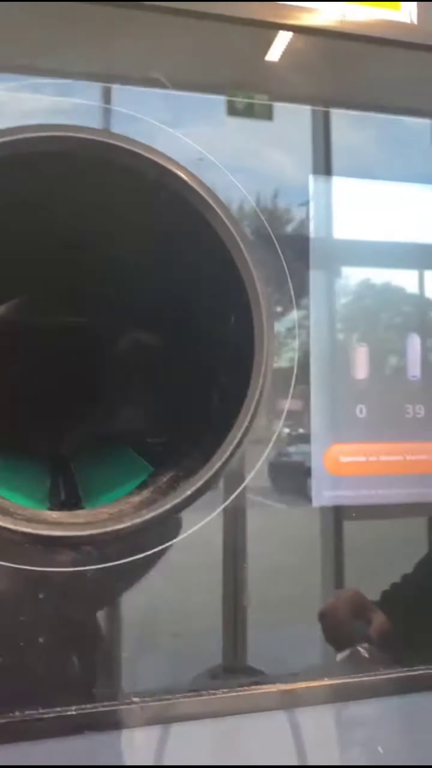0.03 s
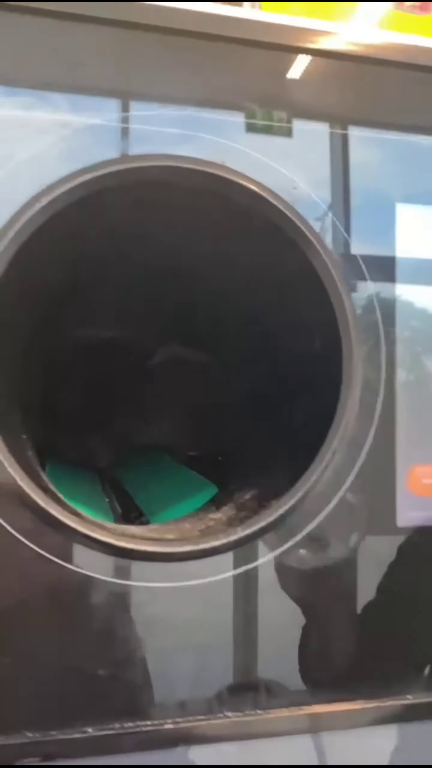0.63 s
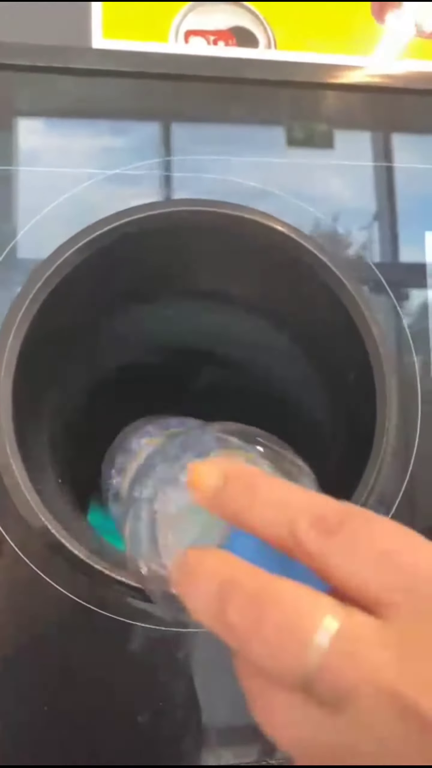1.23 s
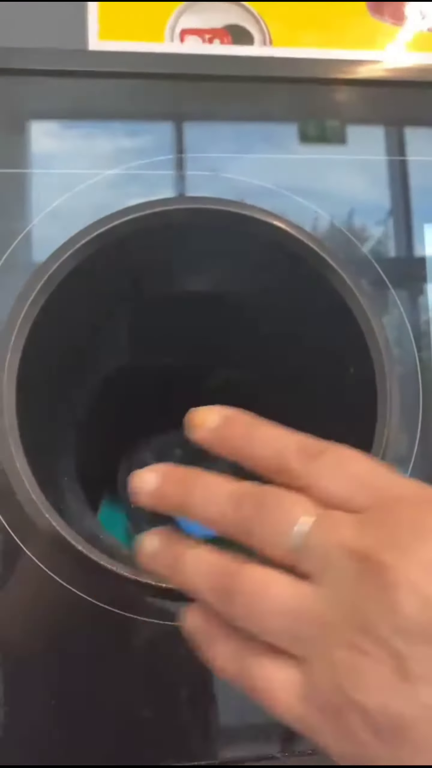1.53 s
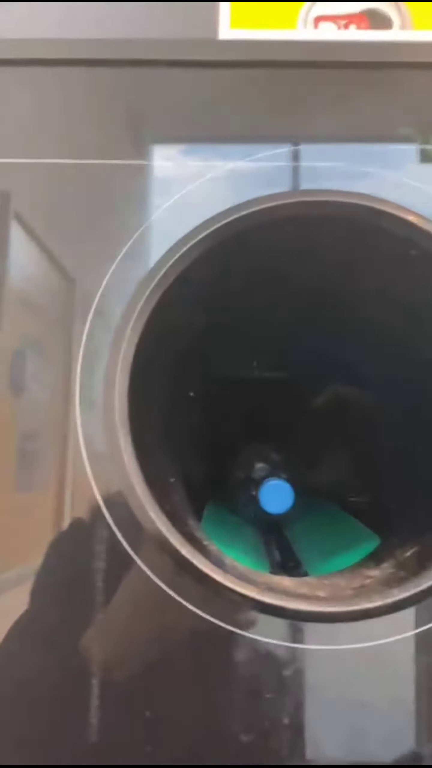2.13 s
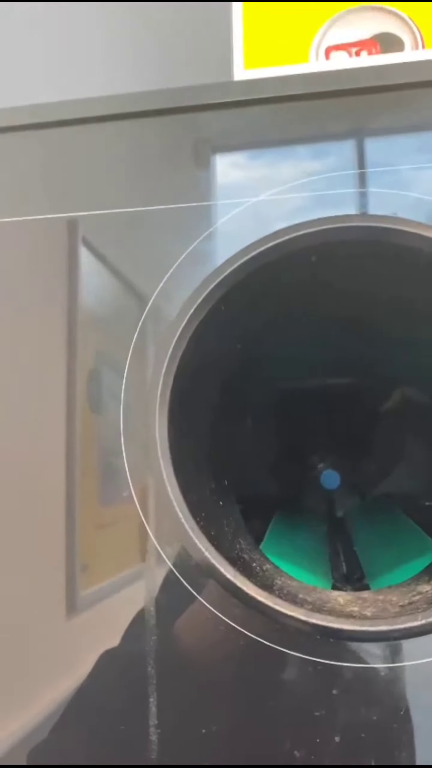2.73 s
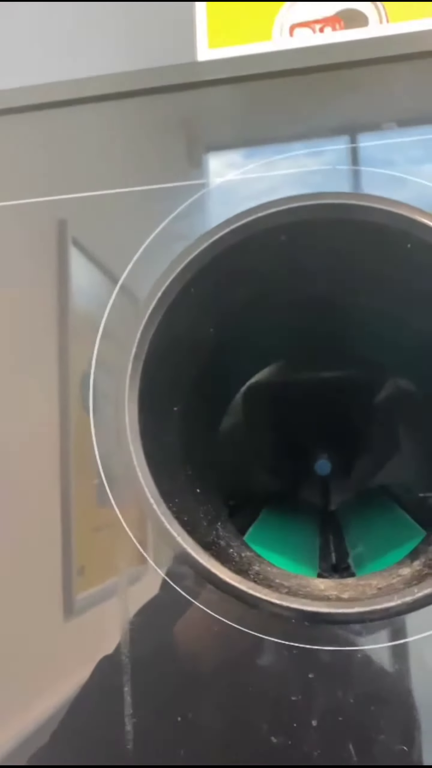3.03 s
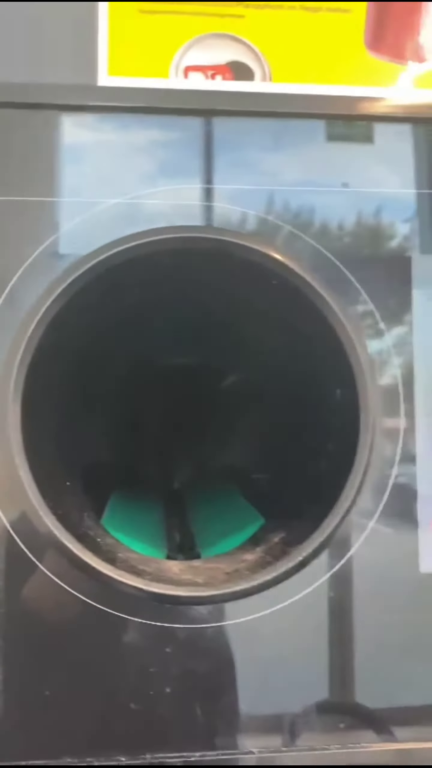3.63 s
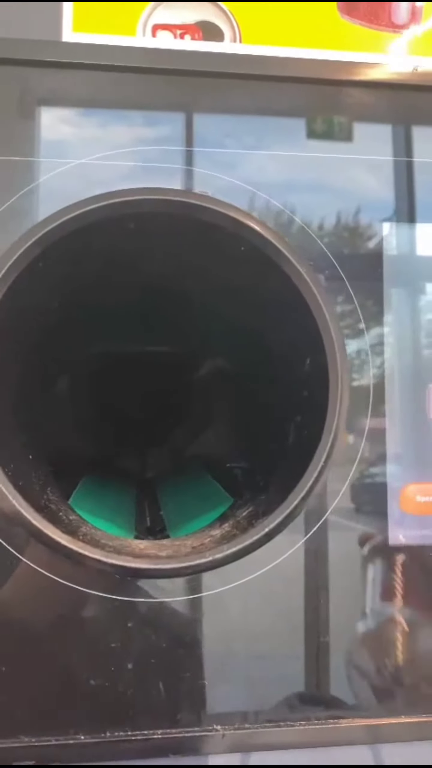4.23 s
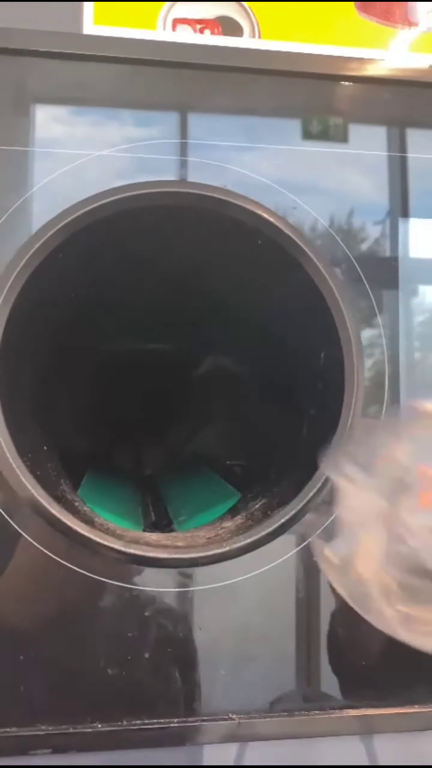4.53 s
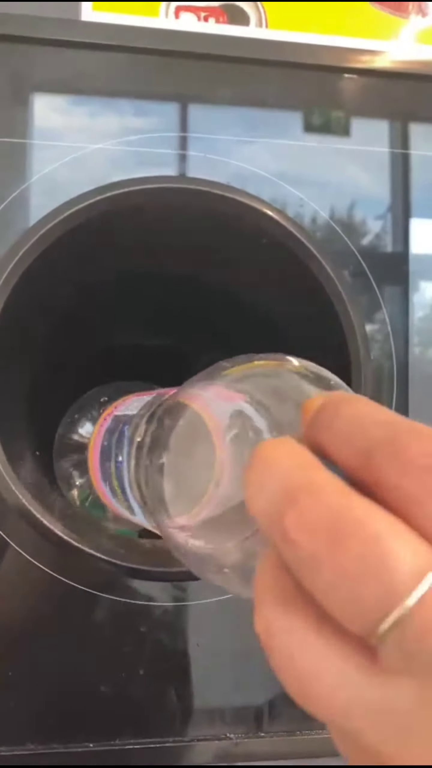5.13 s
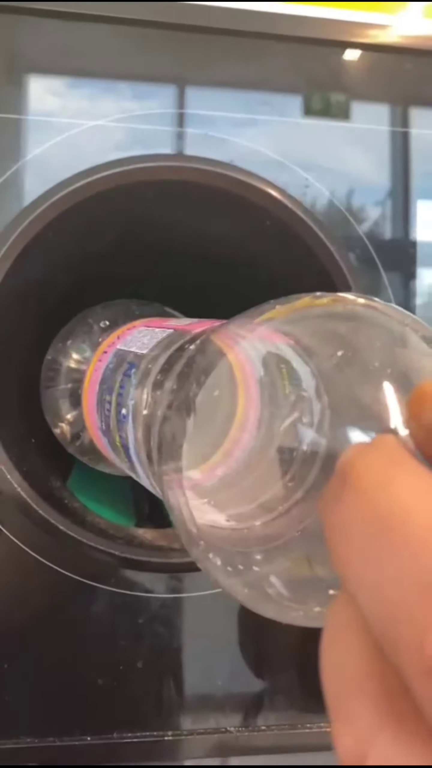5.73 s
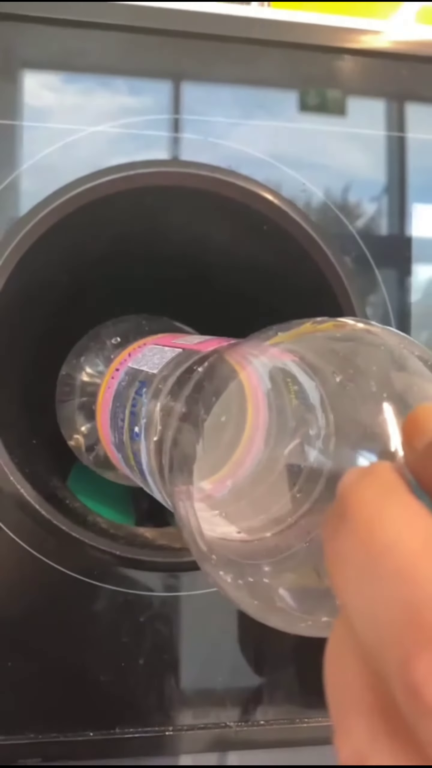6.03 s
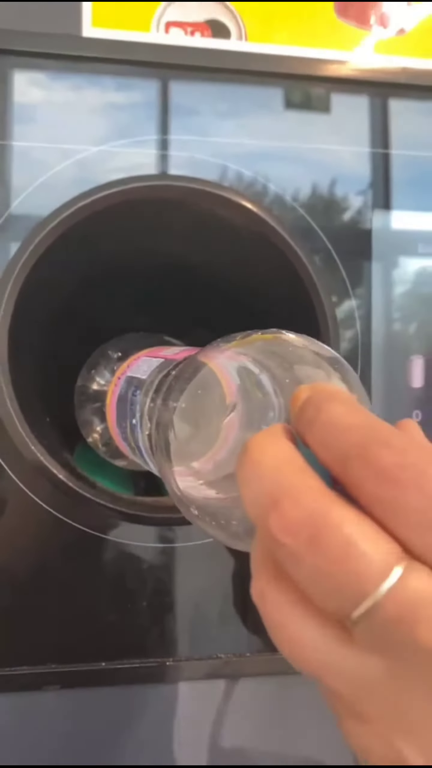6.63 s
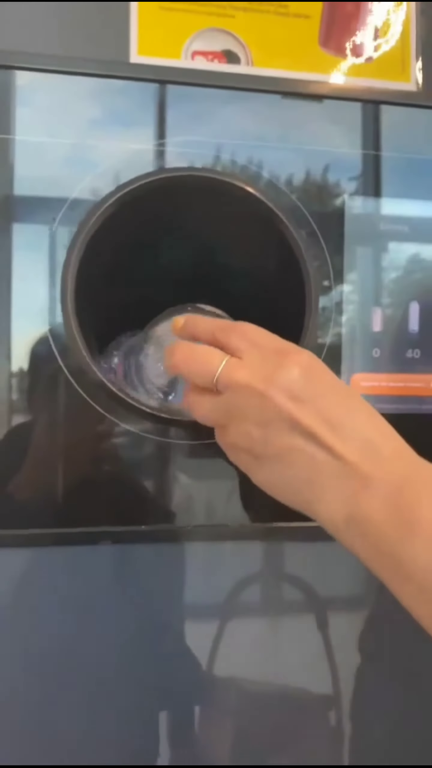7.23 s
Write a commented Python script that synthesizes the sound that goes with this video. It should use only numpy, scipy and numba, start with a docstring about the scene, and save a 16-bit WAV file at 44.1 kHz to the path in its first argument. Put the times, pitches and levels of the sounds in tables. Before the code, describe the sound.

Empty plastic bottles crinkle, snap and bump as they are fed into a humming bottle return machine with a running conveyor belt.

```python
"""In a shop entrance, two empty plastic bottles are fed into a return machine, close to a phone.
A fan rushes, motors hum with a slow beat, and a belt rubs along over rumbling rollers.
The belt carries the first bottle off and drops it inside the cabinet.
Each bottle bumps and scrapes the chute and ticks against the rim. Loudest of all,
the thin walls snap and crinkle in the hand and ring in the round intake."""
import sys
import numpy as np
from scipy import signal
from scipy.fft import rfft, irfft
from scipy.io import wavfile
from scipy.ndimage import uniform_filter1d
from numba import njit

SR = 44100
rng = np.random.default_rng(int(sys.argv[2]) if len(sys.argv) > 2 else 0)


def file_out(sig):
    """Save sig as 16-bit WAV at sys.argv[1]."""
    # one column per channel
    cols = np.atleast_2d(sig).T
    # limit, then scale
    lim = np.clip(cols, -1, 1)
    pcm = np.round(lim * 32767).astype(np.int16)
    wavfile.write(sys.argv[1], SR, pcm)


N = 325017
T = np.arange(N) / SR
FFT_SIZE = 2 ** 19
HZ = np.arange(FFT_SIZE // 2 + 1) * SR / FFT_SIZE + 1e-3
SECOND_BOTTLE_S = 4.5

# Levels in the tables are relative: the functions set the final loudness.
# tone colour of the fan, the rollers and the belt: f/Hz, level/dB
FAN_SPECTRUM = [(18, -34), (30, -9.5), (86, 4.5), (108, -9.5), (272, -10.5), (350, -30), (387, -1),
                (439, -21), (689, -31), (863, -21), (1970, -21.5), (2450, -21), (2700, -29.5), (3980, -33),
                (6570, -38.5), (9500, -41), (12000, -88), (15600, -117), (22000, -120)]
ROLLER_SPECTRUM = [(30, -28), (70, -7.5), (125, 0.5), (175, -6), (270, -4), (350, -7), (480, -6),
                   (620, -15.5), (1000, -18), (3000, -46.5)]
BELT_SPECTRUM = [(300, -21), (650, -3), (870, 9.5), (1100, -4), (1700, -1.5), (2450, -2), (2680, -13),
                 (5000, -16.5), (11000, -30)]
# the rollers rumble more under a bottle: start/s, end/s, boost/dB
ROLLER_LOADS = [(0.282, 0.59, 5), (0.924, 2.414, 2.5), (4.898, 5.85, 2.5)]
# the belt rubs against its guides: middle/s, length/s, boost/dB
GUIDE_RUBS = [(2.56, 0.21, 3), (2.781, 0.17, 8), (2.955, 0.12, 3), (3.117, 0.39, 3.5), (3.365, 0.22, 5),
              (3.674, 0.29, 6.5), (4.08, 0.075, 4), (4.282, 0.11, 3), (4.76, .2, 3)]
# the belt motor takes up load: middle/s, length/s, level/dB
MOTOR_SURGES = [(0.45, 0.7, -40), (1.276, 0.39, -37.5), (1.607, 0.15, -30), (2.04, 0.24, -37.5),
                (2.26, 0.18, -35), (2.467, 0.29, -33.5), (3.515, 1.23, -34.5), (4.75, 0.28, -39),
                (5.183, 0.2, -35.5), (5.997, 0.34, -42), (6.713, 0.19, -39.5)]
# steady tones of the cabinet: f/Hz, level/dB, beat rate/Hz, beat depth (0-1)
HUM_TONES = [(80.3, -46.5, 1.18, 0.1), (99.3, -48, 0.41, 0.07), (132.6, -51, 0.87, 0.66),
             (194.5, -49, 0.713, 0), (260.7, -55.5, 0.89, 0.25), (300.5, -55, 0.52, 0.26),
             (470, -66, 0.57, 0), (663, -60, 0.643, 0.13), (764, -57, 0.95, 0.1), (873, -53, 1.215, 0.22),
             (988, -58.5, 0.63, 0.3)]
# one faint cabinet tone sings out: middle/s, length/s, level/dB
WHINE_SWELLS = [(0.1, 1, -57), (4.7, 0.47, -45.5), (7.04, 1.2, -43.5)]
# a bottle drops inside the cabinet: t/s, level/dB
CABINET_DROPS = [(4.238, -23)]
# a bottle bumps the chute: t/s, level/dB
CHUTE_BUMPS = [(0.462, -28.5), (0.512, -26.5), (0.58, -27), (0.99, -24), (1.105, -29.5), (1.33, -25),
               (1.465, -26), (1.95, -24.5), (2.105, -26), (4.948, -21.5), (5.27, -28), (5.524, -24),
               (5.585, -22), (5.67, -25)]
# what rings when the cabinet or a hollow bottle is struck: f/Hz, level/dB, time to fade by 60 dB/s
CABINET_MODES = [(314, -5, 0.1), (414, 0.5, 0.12), (488, -3, 0.1), (865, -4, .12), (1025, -3, 0.08),
                 (1310, -9, 0.079), (2060, -18, .05)]
FIRST_BUMP_MODES = [(149.3, -0.5, 0.2), (263, -2, 0.16), (303, -5, 0.14), (478, -4, 0.12),
                    (770, -13, 0.064)]
SECOND_BUMP_MODES = [(445, -4.5, 0.18), (751, 2, 0.17), (880, -5, .08), (1760, -8, .06)]
# a bottle scrapes along the chute: start/s, length/s, level/dB, centre f/Hz
CHUTE_SLIDES = [(0.926, 0.22, -44, 1950), (0.965, .035, -35.5, 2320), (1.068, 0.036, -35, 2250),
                (1.119, 0.42, -39.5, 2070), (1.39, 0.086, -38, 2450), (1.549, 0.041, -40.5, 2250),
                (1.646, 0.085, -36, 2550), (1.803, .08, -45.5, 2300), (1.899, 0.052, -35.5, 1700),
                (2.094, 0.086, -40.5, 1590), (2.391, 0.057, -42.5, 1720), (2.555, 0.027, -44, 1720),
                (2.726, 0.052, -45, 1900), (5.57, 0.23, -41.5, 1605), (5.852, .04, -39, 2700),
                (5.921, 0.046, -37.5, 2310), (6.023, 0.028, -30.5, 2200), (6.104, .16, -37, 1870),
                (6.347, 0.056, -46, 2000)]
# light, dry ticks of plastic on the rim: t/s, level/dB
RIM_TICKS = [(0.4173, -9.5), (0.45, -10.5), (0.4854, -4.5), (0.5661, -5), (0.585, -3), (0.6822, -24),
             (0.732, -24), (1.179, -11.5), (1.319, -18), (2.332, -15.5), (3.72, -30), (4.908, -5),
             (5.263, -2.5), (6.594, -29), (6.901, -30), (6.9701, -34), (7.011, -34.5)]
# a bottle rubs under the fingers or on the belt: start/s, length/s, level/dB, treble lift/dB
RUB_STROKES = [(0.33, 0.035, -37.5, -6), (0.437, 0.11, -36, -4), (0.542, 0.032, -29.5, -7),
               (0.772, 0.064, -39, -2.5), (0.861, 0.13, -28.5, 1), (0.996, 0.47, -30.5, 2.5),
               (1.364, 0.23, -33, 3), (1.612, 0.16, -32, 2.5), (1.803, 0.21, -31, 11),
               (2.054, 0.17, -33, 8.5), (2.236, 0.085, -33.5, 1), (2.375, 0.062, -33.5, 0),
               (2.462, 0.17, -49, -7), (4.927, 0.023, -31.5, -11), (5.107, 0.16, -41.5, -17),
               (5.268, 0.059, -27.5, -8), (5.347, 0.13, -34.5, -10), (5.486, 0.039, -31, -13),
               (5.562, 0.2, -25, -3.5), (5.826, 0.13, -32, -9), (6.043, 0.13, -28.5, 3),
               (6.111, 0.1, -27.5, -2), (6.224, 0.13, -34.5, -2), (6.33, 0.049, -34.5, -2),
               (6.464, 0.014, -43, -10), (6.994, 0.17, -54.5, -3)]
# a bottle wall buckles: t/s, level/dB, dent f/Hz, treble lift/dB, rise time/s
WALL_SNAPS = [(0.417, -20, 2470, 4, 0.0018), (0.4496, -15, 2940, 3, .003), (0.4853, -9.5, 5820, 1, 0.0007),
              (0.5656, -9.5, 3000, 12, 0.00065), (0.5724, -13, 1810, 2, 0.0013),
              (0.584, -7.5, 3050, 17, 0.00065), (0.6816, -24, 2930, -6, .0007),
              (0.792, -22.5, 2072, -8, 0.011), (0.853, -21, 2230, 7, 0.0017),
              (0.884, -16.5, 2600, -4, 0.0017), (0.943, -16, 2150, 20, 0.0028),
              (1.027, -25, 2420, -4, 0.0059), (1.128, -26, 2280, -5, 0.0074),
              (1.323, -18, 2440, -3, 0.0075), (1.84, -18.5, 2670, 1, 0.004), (1.936, -18, 1530, 5, 0.008),
              (2.059, -23.5, 2546, 18, 0.0044), (2.09, -16.5, 1800, -10, .005),
              (2.2019, -23, 6870, 22, 0.0041), (2.381, -24.5, 2260, 17, .005),
              (2.477, -30, 1506, -17, 0.0055), (2.498, -38, 1730, -12, 0.0087),
              (2.7074, -33, 2200, 15, 0.0022), (2.801, -30, 2250, -1, .004), (4.907, -8, 6830, 7.5, 0.0011),
              (4.936, -13.5, 1914, 4, 0.012), (5.109, -22.5, 2020, 9.5, 0.0016),
              (5.142, -27, 2360, -15, 0.0067), (5.1739, -14.5, 2604, -1.5, 0.0018),
              (5.235, -15.5, 2525, 5, 0.011), (5.2612, -5.5, 2480, 7, 0.0011),
              (5.2931, -9.5, 1770, 1, 0.001), (5.3547, -17.5, 2670, 5, 0.0016),
              (5.404, -14.5, 2510, 3, 0.001), (5.4976, -19, 2520, 2, 0.00049),
              (5.521, -17, 1980, -1, 0.0023), (5.5752, -16, 1510, -8, 0.0012),
              (5.603, -13.5, 2430, -8, 0.01), (5.668, -13.5, 1990, 1, 0.0062),
              (5.745, -16.5, 1400, 5, .008), (6.015, -13.5, 2287, 0, 0.0052),
              (6.064, -14.5, 2790, 13, 0.0071), (6.1, -10, 2700, 0.5, 0.013), (6.17, -10, 2260, 0.5, 0.008),
              (6.592, -26.5, 2340, -5.5, 0.00056)]
# tone colour of thin plastic: f/Hz, level/dB
PLASTIC_SPECTRUM = [(100, -28), (250, -10.5), (500, -2), (1100, -0.5), (2000, 3), (3200, 3.5), (4500, 3),
                    (6800, 0.5), (8200, -3), (10500, 3), (12000, -15)]
# resonances of each bottle in the intake: f/Hz, width/Hz, level/dB
FIRST_WALL_MODES = [(792, 99, 8), (1460, 120, -0.5), (2250, 133, 3), (2920, 130, -11), (6170, 170, -12)]
SECOND_WALL_MODES = [(451, 30, 7.5), (767, 70, 5), (870, 85, 2.5), (1380, 58, -0.5), (1960, 52, -4),
                     (2250, 290, -4.5), (6600, 300, -5)]
# stereo width, as the side signal compared with the middle: f/Hz, level/dB
STEREO_WIDTH = [(100, -47), (170, -43.5), (310, -24), (400, -14), (620, 0.5), (800, -7), (1150, -5),
                (1900, -25.5), (2600, -5), (5000, -4.5), (6000, -19), (11000, -20)]
# the phone's right microphone compared with its left: f/Hz, level/dB, phase lag/rad
MIC_BALANCE = [(320, 0, 0), (380, -2, 0), (540, -3.5, -0.2), (620, 0, 0), (2200, 0.3, 0), (2850, 10, 0.3),
               (3200, 9, 1.4), (3700, 3, 1.7), (4550, 2, 1.9), (5000, 6, 4.2), (5300, 0.5, 6.2),
               (7200, 0.3, 6.9), (8700, 0, 8.3), (11500, 0, 9.3)]


def undb(db):
    """Turn decibels into a gain."""
    return 10 ** (np.asarray(db) / 20)


def unit(x):
    """Scale to an average (rms) level of one."""
    return x / np.sqrt(np.mean(x ** 2))


def curve(points, column=1):
    """Join one column of a table into a curve over log frequency."""
    points = np.array(points)
    return np.interp(np.log(HZ), np.log(points[:, 0]), points[:, column])


def filtered(x, response):
    """Filter by a frequency response."""
    return irfft(rfft(x, FFT_SIZE) * response)[..., :N]


def causal(db):
    """A response with these levels that rings only after a blow, never before."""
    cepstrum = irfft(np.log(undb(db)))
    cepstrum[1:FFT_SIZE // 2] *= 2
    cepstrum[FFT_SIZE // 2 + 1:] = 0
    return np.exp(rfft(cepstrum))


@njit
def resonate(x, hz, width):
    """Let through a band around a moving pitch, with a gain of one at its peak."""
    y, band, low = np.empty(len(x)), 0., 0.
    for i in range(len(x)):
        tuning, damping = np.tan(np.pi * hz[i] / SR), width / hz[i]
        swing = (band + tuning * (x[i] - low)) / (1 + tuning * (tuning + damping))
        band, low = 2 * swing - band, low + 2 * tuning * swing
        y[i] = damping * swing
    return y


def fade(t, t60):
    """Die away by 60 dB every t60 seconds."""
    return undb(-60 * t / t60)


def swell(middle_s, length_s):
    """A smooth rise to one and fall back."""
    return np.cos(np.pi * np.clip((T - middle_s) / length_s, -.5, .5))


def ramp(start_s, length_s):
    """A straight rise from zero to one."""
    return np.clip((T - start_s) / length_s, 0, 1)


def wobble(per_s):
    """A smooth random curve that heads for a new value per_s times a second."""
    hold = int(SR / per_s)
    steps = np.repeat(rng.standard_normal(N // hold + 1), hold)
    return unit(uniform_filter1d(uniform_filter1d(steps, hold), hold)[:N])


def add(track, s, sound):
    """Mix a short sound in at time s."""
    i = int(s * SR)
    track[i:i + len(sound)] += sound[:N - i]


def diffuse():
    """Noise from all around: alike on both sides in the bass."""
    mid, side = rng.standard_normal((2, N))
    side = filtered(side, undb(curve(STEREO_WIDTH)))
    return np.array([mid + side, mid - side])


def wash(spectrum):
    """Noise from all around with a given tone colour."""
    return unit(filtered(diffuse(), undb(curve(spectrum))))


def fan(level_db=-42.5, flutter_db=0.5):
    """Steady air noise of the machine and the shop."""
    return wash(FAN_SPECTRUM) * undb(level_db + flutter_db * wobble(8.3))


def conveyor(roller_db=-41.5, belt_db=-45.5, judder_db=1.1, chatter_db=1.5, load_ramp_s=0.019):
    """Rollers rumble with their load and the belt rubs in chattering swells; both judder together."""
    judder = undb(judder_db * wobble(60))
    load_db = sum(db * (ramp(start, load_ramp_s) - ramp(end, load_ramp_s))
                  for start, end, db in ROLLER_LOADS)
    rub_db = sum(db * swell(s, length) for s, length, db in GUIDE_RUBS) + chatter_db * wobble(35)
    held_up_db = -8 * ramp(start_s=6.27, length_s=1)  # the second bottle holds the belt up
    rollers = wash(ROLLER_SPECTRUM) * undb(roller_db + load_db)
    belt = wash(BELT_SPECTRUM) * undb(belt_db + rub_db + held_up_db)
    return (rollers + belt) * judder


def motor_tone(hz, wander_hz):
    """One pure tone whose pitch wanders with the motor's speed."""
    return np.sqrt(2) * np.sin(2 * np.pi * np.cumsum(hz + wander_hz * wobble(12)) / SR)


def motors(idle_db=-45, unrest_db=2, whine_idle_db=-51.5, beat_peak_s=0.21):
    """The belt motor drones with its load; the cabinet tones beat slowly and one sings out."""
    load = undb(idle_db + unrest_db * wobble(8))
    for s, length, db in MOTOR_SURGES:
        load = np.maximum(load, undb(db) * swell(s, length))
    hum = load * motor_tone(hz=53.1, wander_hz=1.83)
    for hz, db, beat_hz, depth in HUM_TONES:
        beat = 1 + depth * np.cos(2 * np.pi * beat_hz * (T - beat_peak_s))
        hum += undb(db) * motor_tone(hz, wander_hz=1.0) * beat
    singing = sum(undb(db) * swell(s, length) for s, length, db in WHINE_SWELLS)
    whine = np.hypot(undb(whine_idle_db), singing) * motor_tone(hz=385.6, wander_hz=0.79)
    return hum + whine


def knocks(blows, modes, rattle_db, rattle_t60, rise_s, detune):
    """Soft, dull blows ring a body, each a little differently, and rattle it briefly."""
    out, t = np.zeros(N), T[:SR // 2]
    for s, db in blows:
        ring = np.zeros(len(t))
        for hz, mode_db, t60 in modes:
            pitch = hz * (1 + detune * rng.standard_normal())
            ring += undb(mode_db) * np.sin(2 * np.pi * (pitch * t + rng.random())) * fade(t, t60)
        rattle = undb(rattle_db) * rng.standard_normal(len(t)) * fade(t, rattle_t60)
        knock = (ring + rattle) * np.minimum(t / rise_s, 1)
        add(out, s, undb(db) * knock / np.abs(knock).max())
    return out


def drop():
    """The first bottle falls off the belt and the cabinet rings."""
    return knocks(CABINET_DROPS, CABINET_MODES,
                  rattle_db=-18, rattle_t60=0.048, rise_s=0.0085, detune=0.012)


def bumps():
    """Each hollow bottle bumps the chute and rings with its own notes."""
    early = [(s, db) for s, db in CHUTE_BUMPS if s < SECOND_BOTTLE_S]
    late = [(s, db) for s, db in CHUTE_BUMPS if s >= SECOND_BOTTLE_S]
    first = knocks(early, FIRST_BUMP_MODES, rattle_db=-19, rattle_t60=.04, rise_s=.006, detune=.065)
    second = knocks(late, SECOND_BUMP_MODES, rattle_db=-23, rattle_t60=.04, rise_s=.0022, detune=.01)
    return first + second


def scrape(spread_octaves=0.456, slip_t60=0.012, scatter_db=4, rise_s=0.0068, count=120):
    """The ribbed wall sticks and slips; every slip rings another patch of plastic at another pitch."""
    out, t = np.zeros(N), T[:SR // 20]
    for start, length, db, hz in CHUTE_SLIDES:
        slips = np.zeros(N)
        times = start + rng.random(count) * length
        pitches, sizes = np.clip(rng.standard_normal((count, 2)), -2, 2).T
        for s, pitch, size in zip(times, pitches, sizes):
            ring = np.sin(2 * np.pi * hz * 2 ** (spread_octaves * pitch) * t) * fade(t, slip_t60)
            add(slips, s, undb(scatter_db * size) * ring)
        out += undb(db) * unit(slips) * np.sqrt(length * SR / N) * ramp(start, rise_s)
    return out


def ticks(t60=0.024, centre_hz=6500, width_hz=3500, gain_db=-3):
    """Hard plastic touches the rim, right next to the phone: tiny bursts of bright noise."""
    out, t = np.zeros(N), T[:SR // 20]
    for s, db in RIM_TICKS:
        add(out, s, undb(db + gain_db) * rng.standard_normal(len(t)) * fade(t, t60))
    band_pass = 1 / (1 + 1j * (HZ / centre_hz - centre_hz / HZ) * centre_hz / width_hz)
    return filtered(out, band_pass)


def intake(x, tube_t60=0.056, tube_db=1, hall_t60=0.62, hall_db=-12, hall_top_hz=5000, patterns=8):
    """Direct sound, tube echoes that change as bottle and hand move, and the hall's duller tail."""
    shares = np.array([wobble(24) for _ in range(patterns)])
    shares /= np.sqrt((shares ** 2).sum(0))  # the blend shifts but keeps its power
    tube = np.zeros((2, N))
    for share in shares:
        echoes = unit(diffuse() * fade(T, tube_t60) * (T > .002))
        tube += share * filtered(x, rfft(echoes, FFT_SIZE))
    tail = diffuse() * fade(T, hall_t60) * (T > .015)
    dull_tail = unit(filtered(tail, 1 / (1 + 1j * HZ / hall_top_hz)))
    hall = filtered(x, rfft(dull_tail, FFT_SIZE))
    return x + (undb(tube_db) * tube + undb(hall_db) * hall) / np.sqrt(N)


def brighten(x, lift_db, corner_hz=4300):
    """Tip the balance toward the treble, or away from it if lift_db is negative."""
    low = signal.sosfilt(signal.butter(1, corner_hz, fs=SR, output="sos"), x)
    return low * undb(-lift_db / 2) + (x - low) * undb(lift_db / 2)


def strokes(grip_s=0.018, release_s=0.032, ease_db_per_s=10):
    """Pressure and treble lift of the rubs: each grips quickly, eases while it lasts and lets go."""
    pressure, lift = np.full(N, 1e-9), np.zeros(N)
    for s, length, db, lift_db in RUB_STROKES:
        held = undb(db - ease_db_per_s * np.clip(T - s, 0, length)) * ramp(s, grip_s)
        stroke = held * np.exp(-np.maximum(T - s - length, 0) / release_s)
        lift = np.where(stroke > pressure, lift_db, lift)  # the strongest stroke wins
        pressure = np.maximum(pressure, stroke)
    return pressure, uniform_filter1d(lift, SR // 50)


def crinkle(creases_per_s=1100, scatter_db=4, rub_db=-8, jerk_db=2.0, top_hz=8800,
            sharp_per_s=45, sharp_db=-10):
    """Tiny creases come in jerks over the rub of fingers; only a few sharp ones reach the top treble."""
    pressure, lift_db = strokes()
    sizes = undb(scatter_db * np.minimum(rng.exponential(size=N), 4)) * rng.choice([-1, 1], N)
    creases = unit(sizes * (rng.random(N) < creases_per_s / SR))
    rub = undb(rub_db) * rng.standard_normal(N)
    soft = filtered(creases + rub, 1 / np.sqrt(1 + (HZ / top_hz) ** 20))
    clicks = rng.choice([-1., 1.], N) * (rng.random(N) < sharp_per_s / SR)
    sharp = undb(sharp_db) * unit(brighten(clicks, lift_db=12))
    return brighten(soft + sharp, lift_db) * pressure * undb(jerk_db * wobble(60))


def snaps(crack_t60=0.016, dent_t60=0.02, dent_db=-7, dent_spread=0.239, crunch_s=0.03, crunch_db=-1):
    """A dent pops through with a crack, rings around its own pitch and sets off a crunch of creases."""
    out, t = np.zeros(N), T[:SR // 6]
    for s, db, hz, lift_db, rise_s in WALL_SNAPS:
        hiss, creases, chance = rng.standard_normal((3, len(t)))
        rise = np.minimum(t / rise_s, 1) ** 2
        since_peak = np.maximum(t - rise_s, 0)
        crack = unit(hiss * rise * fade(since_peak, crack_t60))
        pitches = hz * np.exp(dent_spread * rng.standard_normal((8, 1)))
        ring = np.sin(2 * np.pi * (pitches * t + rng.random((8, 1)))).sum(0)
        dent = undb(dent_db) * unit(ring * rise * fade(since_peak, dent_t60))
        burst = unit(creases * (chance > 1) * rise * np.exp(-(t / crunch_s) ** 2))
        crunch = undb(crunch_db) * brighten(burst, lift_db=-3)
        add(out, s, undb(db) * brighten(crack + dent + crunch, lift_db))
    return out


def bottle_wall(push, modes, drift=0.043):
    """The wall sounds over a wide range, and more at its resonances, which shift as it flexes."""
    wall = filtered(push, causal(curve(PLASTIC_SPECTRUM))) + 1e-18
    return wall + sum(undb(db) * resonate(wall, hz * np.exp(drift * wobble(25)), float(width))
                      for hz, width, db in modes)


def bottles(snap_db=-28, crinkle_db=-4):
    """Snaps and crinkles shake the wall of the first bottle, then that of the second."""
    push = undb(snap_db) * snaps() + undb(crinkle_db) * crinkle()
    late = T > SECOND_BOTTLE_S
    return bottle_wall(push * ~late, FIRST_WALL_MODES) + bottle_wall(push * late, SECOND_WALL_MODES)


def scene():
    """Dull knocks, bottles in the intake and ticks at the rim, over the running machine."""
    thuds = bumps() + drop()
    plastic = intake(bottles() + scrape()) + ticks()
    return thuds + plastic + motors() + conveyor() + fan()


def record(dry, top_hz=12000):
    """The phone's two microphones differ in level and phase; peaks are rounded and the top is cut."""
    tilt = undb(curve(MIC_BALANCE) / 2)
    lag = curve(MIC_BALANCE, column=2)
    mics = filtered(dry, np.array([1 / tilt, tilt * np.exp(-1j * lag)]))
    low_pass = signal.ellip(8, .2, 70, top_hz, fs=SR, output="sos")
    return signal.sosfilt(low_pass, np.tanh(mics))


dry = scene()
out = record(dry)
file_out(out)
```